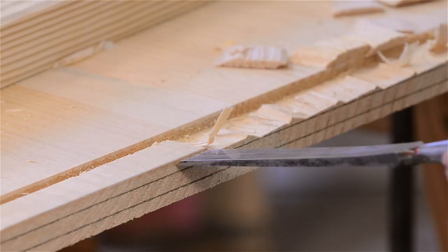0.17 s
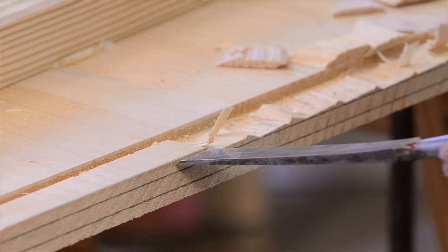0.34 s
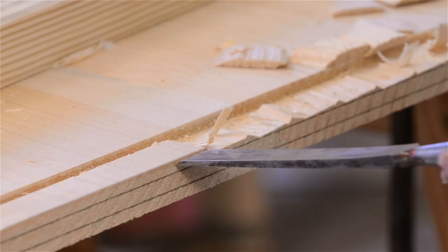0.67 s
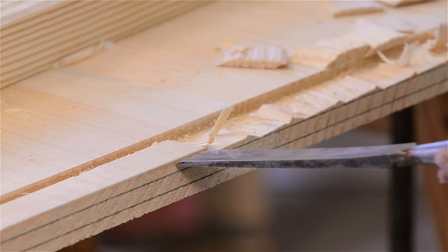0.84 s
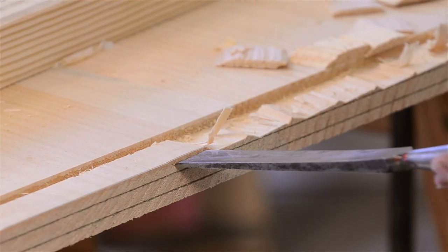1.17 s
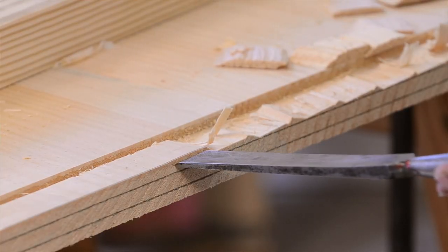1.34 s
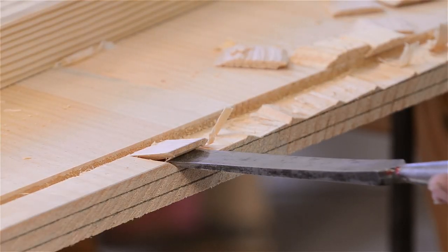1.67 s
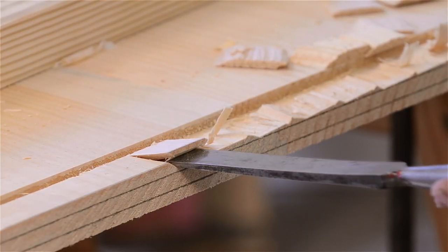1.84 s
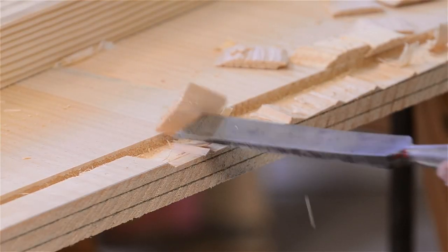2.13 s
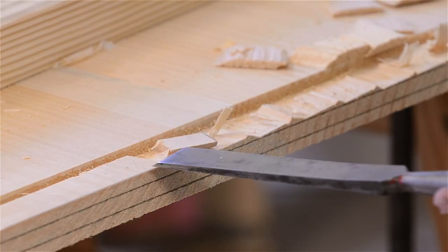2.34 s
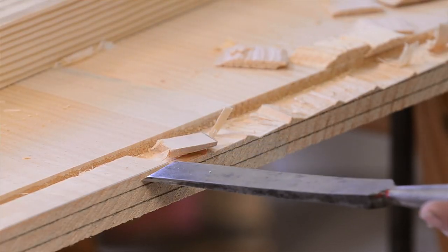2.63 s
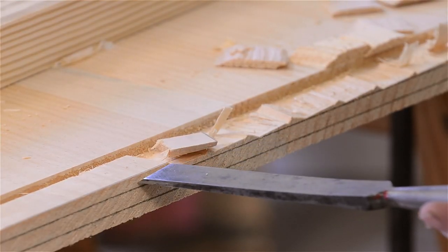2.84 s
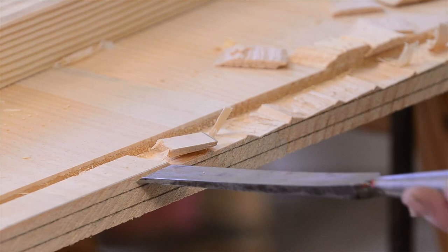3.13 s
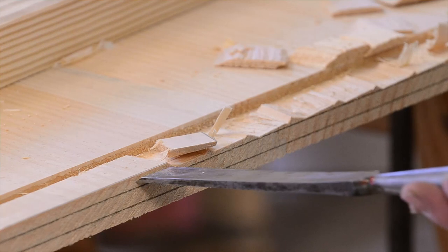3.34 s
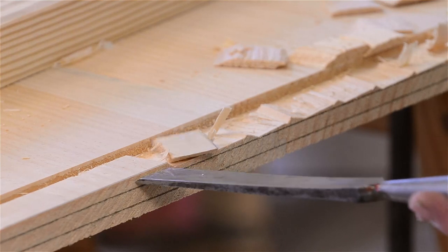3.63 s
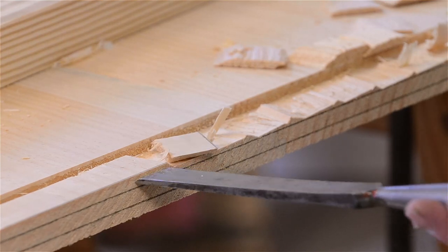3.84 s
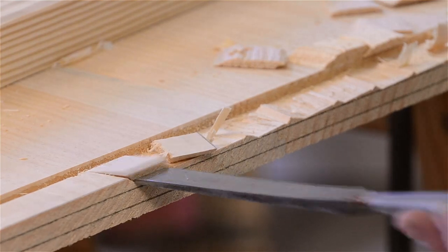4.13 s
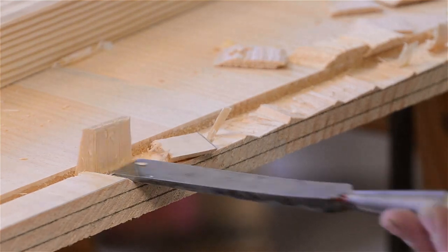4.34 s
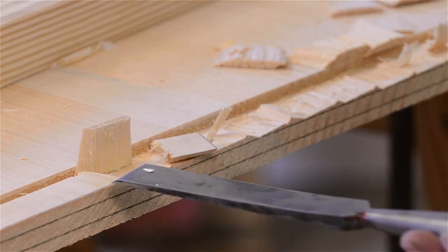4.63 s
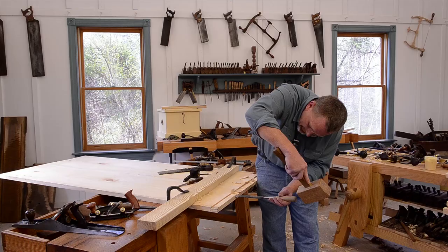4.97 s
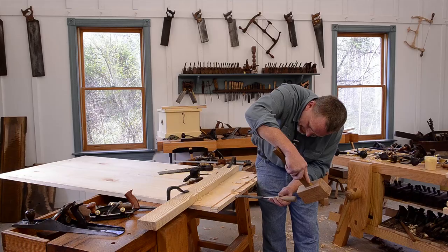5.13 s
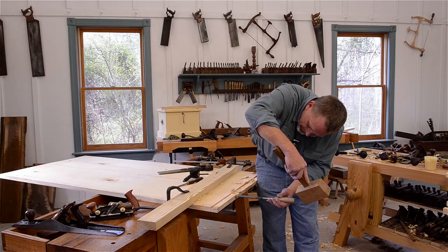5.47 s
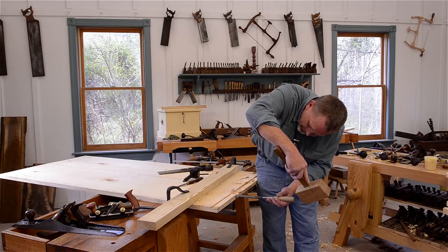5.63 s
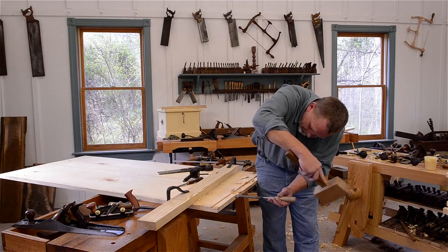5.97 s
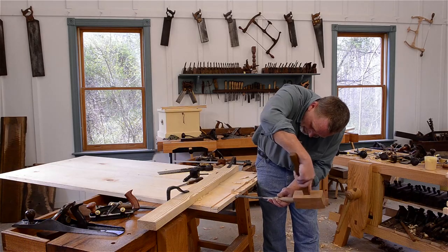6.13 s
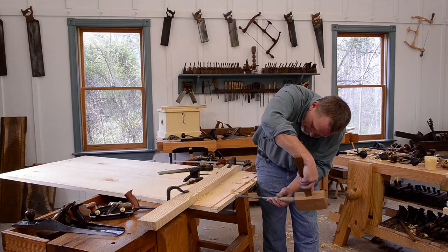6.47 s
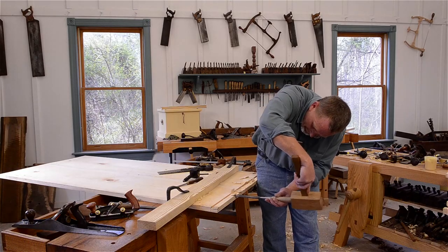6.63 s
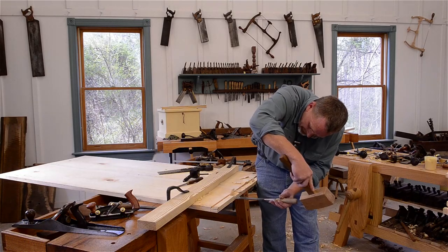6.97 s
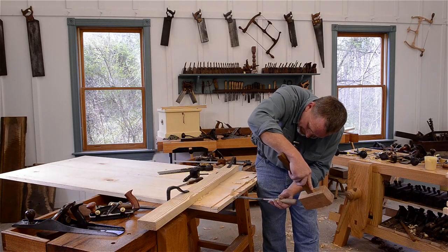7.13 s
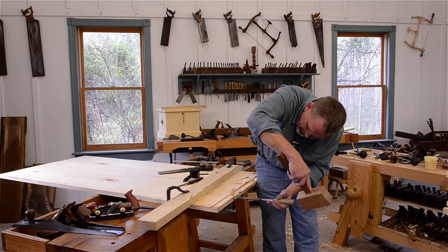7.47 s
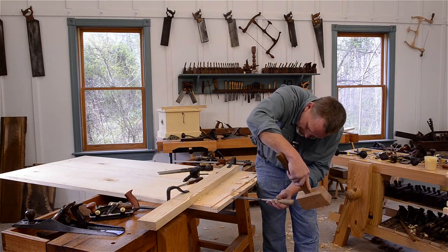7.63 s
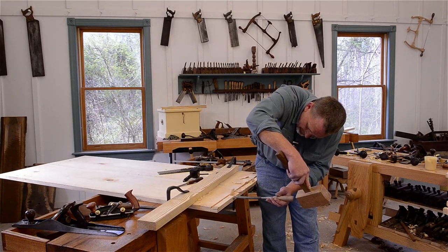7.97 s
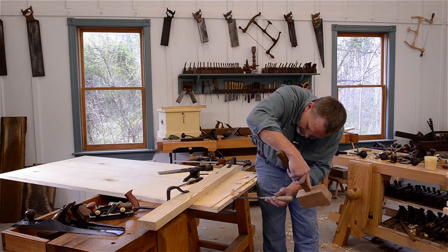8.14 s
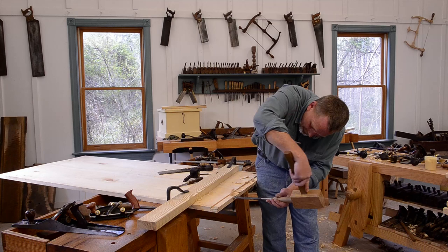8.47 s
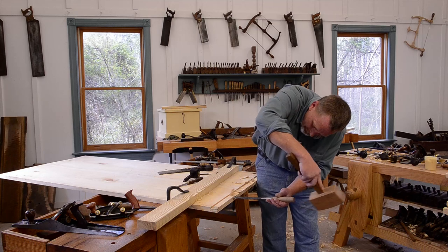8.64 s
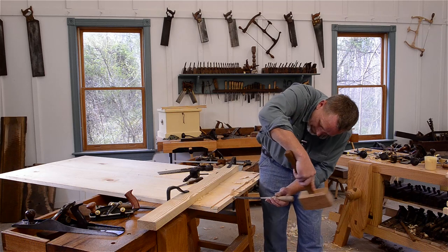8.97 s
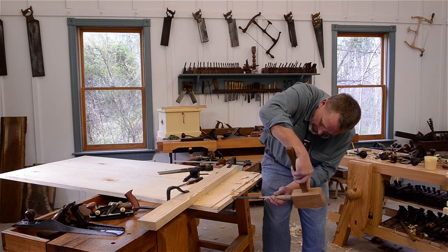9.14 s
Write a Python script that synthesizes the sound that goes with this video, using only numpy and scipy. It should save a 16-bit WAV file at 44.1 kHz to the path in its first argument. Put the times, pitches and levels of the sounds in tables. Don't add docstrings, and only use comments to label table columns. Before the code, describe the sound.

A small, live wooden workshop, heard close in stereo, with faint lamp hum, soft hiss and low rumble. Low air buffets, mostly on the right, flutter in the first half second. A mallet strikes a chisel at 0.4, 0.7, 1.0, 1.2, 1.4, 1.7 and 1.9 seconds: hollow thud and knock, hard clack, brief steely ring, the blow near 1.0 especially full. The softer last one bursts into bright snaps and tearing as the chip lifts, with more air flutter until 2.3; tiny chip taps follow at 2.5 and 2.6. Echo dies over about a second. Three blows at 3.6, 3.9 and 4.2 tear fibres, trailing fine ticks to 4.7. A faint bump comes near 4.9. Blows at 6.1, 6.4 and 6.6 end in sharp splinter pings. After near quiet, blows fall at 8.4, 8.8 and 9.0, the middle one loudest and slightly overloaded, with a rebound and dry rasp ending over the echo.

```python
import sys
import numpy as np
from scipy import signal
from scipy.fft import rfft, irfft, next_fast_len
from scipy.io import wavfile
from scipy.ndimage import uniform_filter1d, map_coordinates

SR = 44100
rng = np.random.default_rng(int(sys.argv[2]) if len(sys.argv) > 2 else 0)


def waveform_to_disk(signal):
    frames = np.transpose(np.atleast_2d(signal))
    scaled = np.clip(frames, -1, 1) * 32767
    samples = np.round(scaled).astype(np.int16)
    wavfile.write(sys.argv[1], SR, samples)


def amplitude_ratio(level_db):
    exponent = np.asarray(level_db, float) / 20
    return 10 ** exponent


N = 410130

# start in seconds, then levels in dB of the bench thud, board knock,
# mallet clack and edge crack.
BLOWS = [(0.4003, -6.5, -7, -13.5, -27.5), (0.732, -5, -2, -13, -27.5), (0.97, 0, 1, -11.5, -24.5),
         (1.199, -3.5, -4.5, -9.5, -21), (1.431, -5.5, -0.5, -7.5, -11), (1.662, -5.5, -14.5, -8, -21.5),
         (1.8855, -16, -12.5, -21, -29), (3.63, -6.5, -3.5, -12, -24), (3.918, -3, 0, -12, -16.5),
         (4.173, -16.5, -8, -12, -26.5), (6.128, -4, -1, -3.5, -18), (6.409, -12.5, 0.5, -10, -13.5),
         (6.637, -15, -14.5, -17, -22), (8.428, -9.5, -13.5, -17, -38.5), (8.771, -5, 9.5, -2, -13.5),
         (9.034, -21, 5.5, -10.5, -26.5)]
# start in seconds, then levels in dB
KNOCKS = [
    (0.009, -41.5, -55.5, -46, -72),
    (1.894, -8.5, -4, -38.5, -34),
    (2.463, -21.5, -36, -55, -67.5),
    (2.648, -23, -36, -49.5, -63),
    (4.941, -34, -53, -50, -72),
    (6.652, -28.5, -16.5, -32, -40),
    (7.552, -43.5, -81, -83.5, -81),
    (9.039, -2.5, -21.5, -8.5, -26),
]
BOARD_REST_HZ = 340


def at_hz(points, hz):
    points = np.array(points)
    return np.interp(np.log(np.maximum(hz, 1)), np.log(points[:, 0]), points[:, 1])


def rms_one(x):
    return x / np.sqrt(np.mean(x ** 2) + 1e-20)


def coloured(x, points):
    size = x.shape[-1]
    hz = np.arange(size // 2 + 1) * SR / size
    return irfft(rfft(x) * amplitude_ratio(at_hz(points, hz)), size)


def drift(rate_hz):
    steps = rng.standard_normal(int(N / SR * 40) + 3)
    return np.interp(np.arange(N) / SR * rate_hz, np.arange(len(steps)), steps)


def add(out, s, sound):
    i = round(s * SR)
    out[i:i + len(sound)] += sound[:N - i]


def bump(hz, centre_hz, db, width=.07):
    return db * np.exp(-.5 * (np.log(np.maximum(hz, 1) / centre_hz) / width) ** 2)


def two_bumps(hz, row):
    return bump(hz, *row[:2], width=0.093) + bump(hz, *row[2:4], width=0.078)


def pulse(level_db):
    cepstrum = irfft(np.log(amplitude_ratio(level_db)))
    cepstrum[1:len(level_db) - 1] *= 2
    cepstrum[len(level_db):] = 0
    return irfft(np.exp(rfft(cepstrum)))


def run_of(s):
    run_starts_s = [3.5, 6, 8.3]
    return np.searchsorted(run_starts_s, s)


def lamp_hum():
    # pitch in Hz, level in dB.
    tones = [(118.4, -71), (242.2, -76), (360.7, -72.5), (479.1, -77), (602.9, -88), (839.8, -85),
             (1319, -92.5), (1561, -89.5), (1680, -89), (1922, -90.5)]
    t, hum = np.arange(N) / SR, np.zeros(N)
    for k, (hz, db) in enumerate(tones):
        hum += np.sqrt(2) * amplitude_ratio(db) * np.sin(2 * np.pi * hz * t + k * k)
    return hum


def hiss():
    # pitch in Hz, level in dB per Hz.
    shop_colour = [(59, -40.5), (100, -0.5), (310, -7.5), (359, -1), (405, -10.5), (477, -4.5), (537, -10),
                   (1590, -18.5), (2600, -23.5), (3500, -36), (4550, -56.5), (7700, -120)]
    # time in seconds, level in dB.
    shop_level = [(0, -58.5), (.35, -53), (2.4, -54), (3, -60), (3.5, -69.5), (4.8, -60), (5.3, -61),
                  (5.7, -70.5), (6.05, -59.5), (7.3, -62.5), (7.8, -74), (8.3, -63.5), (9.3, -62)]
    # pitch in Hz, level in dB per Hz.
    mic_colour = [(1500, -11), (3500, 3.5), (9000, 0.5), (12000, -4), (15700, -9)]
    white = rng.standard_normal((3, N))
    level_db = np.interp(np.arange(N) / SR, *np.transpose(shop_level)) + .8 * drift(2.5)
    shop = rms_one(coloured(white[0] + 0.22 * white[1:], shop_colour))
    return amplitude_ratio(level_db) * shop + amplitude_ratio(-76.0) * rms_one(coloured(white[1:], mic_colour))


def air():
    # start in seconds, length in seconds, level in dB, left minus right in dB.
    gust_rows = [(-0.07, 0.115, -38, -29.5), (.1, .04, -49, -13), (.19, .03, -52, -12),
                 (0.275, 0.1, -39, -24.5), (0.46, 0.03, -34, -3), (1.985, 0.025, -36, -10),
                 (2.065, .035, -30, -16), (2.12, .07, -36, -8), (2.2, .065, -31.5, -11),
                 (2.33, .03, -44, -18), (3.47, .06, -58, 0.5), (6.06, .06, -54, 2.5)]
    # pitch in Hz, level in dB per Hz.
    gust_colour = [(10, -23.5), (25, -4.5), (45, -0.5), (100, -9), (180, -21), (400, -60), (1000, -130)]
    # pitch in Hz, level in dB per Hz.
    rumble_colour = [(8, -9.5), (22, 1.5), (45, -5.5), (90, -16.5), (200, -48)]
    # pitch in Hz, level in dB.
    jolt_colour = [(25, -6), (60, 0.05), (130, 4.5)]
    jolt_run_db = [-3.5, 2, 4, -2]
    gust_rise_s, gust_fall_db_per_s, gust_even_s, still_air_db = 0.02, 320, .045, -72
    jolt_db, jolt_rise_s, jolt_t60_s = -27.5, .012, 0.27
    t = np.arange(SR) / SR
    winds = rms_one(coloured(rng.standard_normal((3, N)), gust_colour))
    both = winds[2]
    left, right = (v / np.sqrt(uniform_filter1d(v ** 2, size=round(gust_even_s * SR)) + 1e-3) for v in winds[:2])
    rumble = amplitude_ratio(-59.5 + 2.6 * drift(5.3)) * rms_one(coloured(rng.standard_normal(N), rumble_colour))
    gusts, jolts = np.full((2, N), amplitude_ratio(still_air_db)), np.zeros(N)
    for s, length, db, lean_db in gust_rows:
        age = t - min(s, 0)
        fall_db = gust_fall_db_per_s * np.maximum(age - length, 0)
        shape = np.minimum(age / gust_rise_s, 1) * amplitude_ratio(db - fall_db)
        add(gusts[0], max(s, 0), shape * amplitude_ratio(lean_db / 2))
        add(gusts[1], max(s, 0), shape * amplitude_ratio(-lean_db / 2))
    for s, thud_db, *_ in BLOWS + KNOCKS:
        level_db = jolt_db + jolt_run_db[run_of(s)] + thud_db - 60 * t / jolt_t60_s
        add(jolts, s, amplitude_ratio(level_db) * (1 - np.exp(-(t / jolt_rise_s) ** 2)))
    return gusts * [left, right] + rumble + jolts * rms_one(coloured(both, jolt_colour))


def workshop(x, wet_db, onset_s):
    # pitch in Hz, seconds to fade by 60 dB.
    room_t60 = [(60, 0.8), (160, 0.97), (420, 1.05), (1100, 0.96), (1700, 1), (2250, 1.05), (3000, .9),
                (5000, 0.82), (11000, 0.62), (15000, 0.5)]
    # pitch in Hz, level in dB.
    room_colour = [(60, -18.5), (130, -9.5), (200, 1.5), (250, 6.5), (340, 3), (450, 0.5), (700, -2.5),
                   (1000, -0.5), (1600, -4.5), (2300, -2.5), (3500, -7.5), (6000, -11), (11000, -18.5),
                   (11800, -25), (13000, -29), (15500, -32)]
    # pitch in Hz, likeness of left and right from 0 to 1.
    likeness = [(60, 0.8), (300, .99), (600, .9), (1200, .9), (2400, .62), (4800, .1), (12000, 0.1)]
    bands_hz = 40 * 2 ** np.arange(0, 8.8, 1 / 3)
    t = np.arange(int(1.6 * SR)) / SR
    white, answer = rng.standard_normal((2, 2, len(t))), 0
    for k, (low, high) in enumerate(zip(bands_hz, bands_hz[1:])):
        band = signal.butter(2, [low, high], "band", fs=SR, output="sos")
        mid, side = signal.sosfilt(band, white[k % 2])
        hz = np.sqrt(low * high)
        alike = np.clip(at_hz(likeness, hz), 0, 1)
        fall_db = -60 * t / at_hz(room_t60, hz)
        fall = amplitude_ratio(fall_db) + amplitude_ratio(-30 + 0.45 * fall_db)
        stereo = np.sqrt(1 + alike) * mid + np.sqrt(1 - alike) * side * [[1], [-1]]
        answer = answer + amplitude_ratio(wet_db + at_hz(room_colour, hz)) * fall * stereo
    answer = answer * (1 - np.exp(-(t / onset_s) ** 2))
    return signal.fftconvolve(x[None], answer)[:, :N]


def tearing():
    # start in seconds, length in seconds, level at start in dB, level at end in dB, favoured pitch in Hz.
    stretches = [(1.901, 0.067, -54, -50, 9010), (1.975, .32, -62.5, -78, 5500),
                 (3.122, .12, -77.5, -81, 6520), (5.36, .2, -84, -75, 8000), (8.03, .1, -74, -77.5, 8000),
                 (3.718, .2, -71.5, -57, 11000), (3.935, .25, -47, -57, 8100),
                 (4.192, .21, -55.5, -58.5, 11000), (4.397, .15, -61, -83.5, 11000),
                 (5.797, .33, -80.5, -69.5, 10030), (6.686, 0.17, -58, -77, 10050),
                 (8.58, .195, -75.5, -66.5, 10480), (9.041, .14, -58, -74, 12500),
                 (9.2, .12, -61.5, -56.5, 9500), (5.27, .05, -80, -80, 7980),
                 (8.435, .16, -66.5, -76.5, 12530)]
    # pitch in Hz, level in dB per Hz.
    tear_colour = [(1500, -34.5), (3000, 3.5), (5000, 1.5), (7000, -4), (10000, -0.5), (13000, -3),
                   (15700, -2)]
    edge_s = 0.013
    out = np.zeros((2, N))
    snaps = rng.standard_normal((2, N)) * amplitude_ratio(1.5 * rng.exponential(1, N))
    snaps = rms_one(coloured(snaps[0] + .5 * snaps, tear_colour))
    for s, length, start_db, end_db, favoured_hz in stretches:
        piece = snaps[:, round(s * SR):][:, :round(length * SR)]
        t = np.arange(piece.shape[1]) / SR
        hz = np.arange(len(t) // 2 + 1) * SR / len(t)
        grains = irfft(rfft(piece) * amplitude_ratio(bump(hz, favoured_hz, 5.5, width=.25)), len(t))
        edges = np.clip(np.minimum(t, length - t) / edge_s, 0, 1)
        level = amplitude_ratio(start_db + (end_db - start_db) * t / length)
        for port, sound in zip(out, grains):
            add(port, s, sound * edges * level)
    return amplitude_ratio(3.0) * out


def ticks():
    # start in seconds, peak in dB, pitch in Hz.
    tick_rows = [(0.4579, -6.5, 2120), (2.1795, -48.5, 2780), (2.2236, -38, 2600), (2.2233, -47.5, 6000),
                 (2.4633, -58, 2850), (2.5447, -53.5, 3700), (2.6138, -59, 2840), (2.6484, -57, 2720),
                 (3.8097, -35.5, 2825), (5.0194, -64, 8000), (8.5099, -49, 3140),
                 (1.9657, -22.5, 12050), (2.2787, -49.5, 8840), (2.7487, -55.5, 9040),
                      (4.2969, -34.5, 8990), (4.5996, -59, 8000), (4.6264, -55.5, 8000),
                      (4.6435, -51, 10040), (4.679, -65.5, 8530), (4.7145, -60, 11470), (6.656, -28, 9930),
                      (6.922, -49, 12000), (0.458, -32.5, 6960), (6.9605, -42, 7080),
                      (6.9876, -45.5, 10320),
                 (2.546, -57.5, 10500),
        (2.648, -62, 9300),
        (2.7089, -64, 13100),
        (2.8, -63, 11000),
        (4.298, -41, 5570),
        (9.21, -53.5, 13000),
        (9.236, -50.5, 8000),
    ]
    out, t = np.zeros(N), np.arange(SR // 50) / SR
    for s, peak_db, hz in tick_rows:
        skirts = [(hz / 2.2, -24), (hz / 1.2, -2), (hz * 1.2, -2), (hz * 1.8, -15), (hz * 4, -32)]
        grit = rms_one(coloured(rng.standard_normal(len(t)), skirts))
        add(out, s, amplitude_ratio(peak_db - 4.0 - 60 * t / 0.009) * grit)
    return out


def pings():
    # start in seconds, peak in dB, pitch in Hz, seconds to fade by 60 dB.
    ping_rows = [(1.8885, -22, 12070, 0.011), (1.892, -18, 11480, 0.0067), (1.903, -35.5, 8800, .008),
                 (1.91, -34, 9920, .008), (1.92, -38, 11480, 0.032), (1.922, -33, 5990, 0.016),
                 (1.94, -34, 9000, .01), (1.9445, -32, 9030, 0.017), (1.947, -37, 11790, .03),
                 (1.962, -40, 12000, .01), (4.187, -30, 9010, 0.0074), (4.1955, -29, 9750, .006),
                 (4.199, -36, 10750, 0.0092), (4.203, -33, 11000, .012), (4.211, -35.5, 11000, 0.013),
                 (6.648, -33.5, 10500, 0.0082), (6.656, -19, 12300, 0.011), (6.6595, -29, 12000, .012),
                 (6.66, -31, 10020, 0.0088), (6.663, -33, 6200, .008), (6.6675, -27.5, 10500, .008),
                 (6.6715, -25, 11900, 0.02), (6.682, -30, 11480, .006), (2.464, -62.5, 5740, 0.026),
                 (2.648, -60.5, 5700, 0.027), (5.015, -62, 4203, 0.039), (6.9015, -51.5, 14500, 0.0063),
                 (6.951, -55, 11000, 0.0054), (6.979, -54, 9470, 0.0049), (9.088, -48, 13500, 0.0061),
                 (2.755, -66, 10130, .15), (.74, -52, 11150, .5), (.98, -46, 11200, .5),
                 (.98, -43, 6970, .6), (.98, -44, 8450, .6)]
    out, t = np.zeros(N), np.arange(SR // 4) / SR
    for s, peak_db, hz, t60 in ping_rows:
        rough = 1 + 1.8 * uniform_filter1d(rng.standard_normal(len(t)), size=12)
        rise = np.minimum(t / .0006, 1)
        add(out, s, amplitude_ratio(peak_db - 60 * t / t60) * rise * rough * np.sin(2 * np.pi * hz * t))
    return out


def strike(hit, contact, shade, snap, note_hz, ring_db, crack_db, push_db, spread_db):
    # pitch in Hz, seconds to fade
    # by 60 dB, then level in dB in run 1, 2, 3, 4.
    resonances = [(103, 0.23, -19.5, -16, -15, -13), (1805, 0.8, -27.5, -31, -29.5, -29),
                  (2340, 0.2, -33, -35.5, -28, -28), (172, 0.1, -7.5, -11.5, -5.5, -11),
                  (244.7, 0.12, -1.5, -6.5, 0, -4.5), (309, 0.074, -4, -4, -5.5, -4.5),
                  (343, 0.11, -0.5, -4, -3.5, -5.5), (423.6, 0.13, -4.5, -6.5, -5, -3),
                  (494, 0.034, -8, 1.5, -4, 1.5), (587, 0.065, -7, -2, 5.5, -4),
                  (706, 0.039, 3.5, -13, -8, -10.5), (780.7, 0.035, -1.5, -8, 1.5, -5),
                  (970, 0.0083, -6.5, -16, -11, -8.5), (1163, 0.029, -12.5, -9, -15.5, -2),
             (1230, 0.052, -6.5, -6.5, -10, -7), (1400, 0.047, -5, -6.5, 0, -7.5),
             (1600, 0.019, -14, -19, -14, 9), (2070, 0.023, -7.5, -6.5, 5.5, -13),
             (2244, 0.053, -6, -1.5, -3, -8.5), (2705, 0.029, 1.5, -4.5, 1.5, -5.5),
             (2923, 0.076, -14, -7, -13.5, -7), (3580, 0.058, -14, -8.5, -14.5, -12),
             (4170, 0.049, -17.5, -16, -7, -9)]
    # pitch in Hz, level in dB.
    crack_colour = [(60, -33), (200, -2), (700, 1), (2000, 3.5), (4000, 0.5), (8000, 5.5), (11000, -1),
                    (13500, -4), (15500, -13), (18000, -28.5)]
    # pitch in Hz, then level in dB in run 1, 2, 3, 4.
    bench_colour = [(200, -3, -1.1, 2, -0.1), (326, -6.5, 0.24, 3.5, -1.5), (560.4, -2, -2, 8.5, 3.5),
                    (765, 0.5, 0.53, 2, -0.4), (1300, 3, 0.088, 2, 1.2), (1810, -0.5, -0.2, 3.5, -0.5),
                    (2223, -3, 2.2, -6, 2), (3000, -1, 0.26, 1.5, 3.5), (3380, 1, 2, 0, 1.5),
                    (4100, -1, -2, -2, -0.9), (5287, -2.5, -0.81, 1, -1), (6200, 2.5, 0.5, 4, 3),
                    (7183, -0.5, -0.5, 3, 0.5), (8600, 4, -0.5, 5, 2), (9900, -0.5, -0.5, 4.5, 0.5),
                    (11000, 4, -0.5, 5, -0.5), (12000, -1.5, -0.5, 5, 1.5)]
    ring_share = .24
    s, thud, knock, clack, crack = hit
    edge_hz, wet_db, *cut = contact
    run = run_of(s)
    t = np.arange(16384) / SR
    axis_hz = np.arange(len(t) // 2 + 1) * SR / len(t)
    parts = [(250, thud), (750, knock), (1600, clack + 2.2), (edge_hz, clack - 2.5),
             (edge_hz * 1.12, crack + 5), (9000, crack)]
    parts_db = at_hz(parts, axis_hz)

    hz, t60, *runs_db = np.transpose(resonances)
    swell = 1 - np.exp(-(np.outer(hz, t) / .9) ** 2)
    rings = np.sin(2 * np.pi * np.outer(hz, t)) * amplitude_ratio(-60 * t / t60[:, None]) * swell
    chance = rng.standard_normal((2, len(hz)))
    level_db = runs_db[run] + at_hz(parts, hz) + ring_db + spread_db * chance[0]
    level_db += 0.35 * (bump(hz, *cut[:2]) + bump(hz, *cut[2:]))
    ring = amplitude_ratio(level_db + two_bumps(hz, shade)) * np.sign(chance[1]) @ rings
    close = amplitude_ratio(level_db + two_bumps(hz, snap)) * np.sign(chance[1]) @ rings
    ring, close = (np.interp(t * note_hz / BOARD_REST_HZ, t, v, right=0) for v in (ring, close))

    grit_db = at_hz(crack_colour, axis_hz) + parts_db + two_bumps(axis_hz, snap)
    grit = irfft(rfft(rng.standard_normal(len(t))) * amplitude_ratio(grit_db))
    dull = signal.sosfilt(signal.butter(2, 6000, fs=SR, output="sos"), grit)
    burst = grit * amplitude_ratio(-60 * t / snap[4]) + dull * amplitude_ratio(-17.0 - 60 * t / 0.044)
    near = close + amplitude_ratio(crack_db) * burst * np.minimum(t / 0.00019, 1)

    radiated_db = at_hz([(row[0], row[1 + run]) for row in bench_colour], axis_hz) + parts_db
    radiated_db += bump(axis_hz, *cut[:2]) + bump(axis_hz, *cut[2:]) + two_bumps(axis_hz, shade)
    radiated_db += at_hz([(7000, 0), (9500, shade[4])], axis_hz)
    push = amplitude_ratio(wet_db) * (amplitude_ratio(push_db) * pulse(radiated_db) + ring_share * ring)
    return near, push


def soft_knocks():
    contact = (1900, -4, 250, 0, 250, 0)
    plain, snap = (250, 0, 250, 0, 0), (330, -5, 250, 1.75, .013)
    near, push = np.zeros(N), np.zeros(N)
    for hit in KNOCKS:
        close, pushed = strike(hit, contact, plain, snap, BOARD_REST_HZ,
                               ring_db=-8.0, crack_db=-8.5, push_db=29.5, spread_db=3.5)
        add(near, hit[0], close)
        add(push, hit[0], pushed)
    return near, push


def mallet_blows():
    # pitch in Hz above which the wood is driven less, share sent to the room in
    # dB, favoured pitch in Hz, its boost in dB, pitch in Hz that sounds weaker.
    contacts = [(3004, -0.5, 1900, -0.5, 470), (3530, 1.5, 2200, 2, 180), (3700, 4, 4700, 3.5, 270),
                (3694, 2.5, 720, 0.5, 230), (3700, 0.5, 330, 6.5, 300), (3307, -1.5, 1100, 12.5, 1100),
                (2910, 0.5, 580, -6.5, 4100), (2930, 2.5, 320, 7, 590), (2960, 1.5, 1550, 7, 220),
                (2820, 2.5, 1030, 3.5, 1520), (4600, 2, 2250, 6.5, 600), (3700, -0.5, 3640, 7.5, 570),
                (2230, -5.5, 1500, 8.5, 1700), (2148, 0, 3060, 5, 1640), (3700, 2, 510, 2, 830),
                (4130, -7.5, 1500, 3.5, 780)]
    # resonance in Hz, its level in dB, second resonance in Hz, its level in dB,
    # treble above 8 kHz in dB.
    shades = [(800, 4.5, 290, -7.5, -10), (530, -6, 1340, 5.5, 4.5), (600, -6, 190, -5.5, 4.5),
              (850, 5.5, 1200, 5.5, 3), (664, 5.5, 2130, 3.5, 2), (806, 15.5, 300, -12, -2),
              (250, -2, 710, -2.5, 2), (267, -3.5, 1300, 3.5, 0), (3400, -8, 950, -12, 2.5),
              (3920, 8, 2400, -1.5, 0), (1880, 4, 3800, 3, 2), (686, -8, 2700, 1, 0),
              (540, -2.5, 1700, -4, 1.5), (262, -5.5, 1380, -3.5, -4), (266, 3.5, 1200, 2.5, 2),
              (817, 11.5, 600, -5, 0.5)]
    # resonance in Hz, its level in dB, second resonance in Hz, its level in dB,
    # seconds for the snap to fade by 60 dB.
    snaps = [(4240, 7.5, 5500, 6.5, 0.015), (4800, -7, 280, 4, 0.026), (1050, 8.5, 4100, -5.5, 0.015),
             (1360, 6.5, 420, -5, 0.021), (249.9, -8, 9800, 6, 0.02), (213.4, -21.5, 670, 8.5, 0.018),
             (2119, -10, 3100, 6.5, 0.024), (270, 9, 550, 8, 0.02), (4240, -12, 1400, 4, 0.023),
             (266.2, 12, 3600, 11.5, .025), (1900, 5, 300, -6, 0.017), (1330, 7, 4100, -6, 0.024),
             (1650, 11, 310, 4.5, 0.019), (3850, 6, 2290, 4.5, 0.012), (211, -9.5, 350, 5.5, 0.018),
             (265, 14, 1500, -6, .02)]
    notes_hz = [338, 339.2, 337.4, 339.5, 341.7, 341, 332, 340.5, 337, 338.6, 341, 337, 338, 337.2, 342.9,
                338]
    damp_db = -14.5
    near, push = np.zeros(N), np.zeros(N)
    for hit, contact, shade, snap, note_hz in zip(BLOWS, contacts, shades, snaps, notes_hz):
        close, pushed = strike(hit, (*contact, damp_db), shade, snap, note_hz,
                               ring_db=-1.0, crack_db=10.5, push_db=26.5, spread_db=3.0)
        add(near, hit[0], close)
        add(push, hit[0], pushed)
    return near, push


def echoes(x, cut_hz):
    # delay in seconds, level in dB.
    reflections = [(.0045, -12), (.009, -4), (.014, -13.5), (.021, -16), (.028, -18)]
    dull, out = signal.sosfilt(signal.butter(2, cut_hz, fs=SR, output="sos"), x), x.copy()
    for k, (s, db) in enumerate(reflections):
        add(out, s, (-1) ** k * amplitude_ratio(db) * dull)
    return out


def ports(x, lag_s):
    # pitch in Hz, left minus right in dB.
    lean = [(200, .3), (1000, .5), (2000, 2), (4000, .5), (8000, 4.5), (12000, 3.5)]
    # pitch in Hz, phase shift between ports in radians.
    scatter = [(500, .2), (1200, .3), (2400, .4), (4800, 1.1), (9500, 1.1), (14000, 1.3)]
    scatter_step_hz = 900
    size = next_fast_len(N + 999)
    hz = np.arange(size // 2 + 1) * SR / size
    knots = rng.standard_normal(round(SR / 2 / scatter_step_hz) + 2)
    wobble = map_coordinates(knots, [hz / scatter_step_hz], order=3)
    phase = -np.pi * hz * lag_s + .5 * at_hz(scatter, hz) * wobble
    half = amplitude_ratio(at_hz(lean, np.maximum(hz, 200)) / 2) * np.exp(1j * phase)
    return irfft(rfft(x, size) * np.array([half, 1 / half]), size)[:, :N]


def scene():
    hard, hard_push = mallet_blows()
    soft, soft_push = soft_knocks()
    room = workshop(hard_push + soft_push, wet_db=-32.0, onset_s=0.01)
    room = room * amplitude_ratio([[0.5], [-0.5]])
    direct = ports(echoes(hard + soft, cut_hz=1100.0) + ticks() + pings(), lag_s=.000012)
    return direct + room + tearing() + hiss() + lamp_hum() + air()


def top_cut(x):
    return signal.sosfilt(signal.butter(12, 15850, fs=SR, output="sos"), x)


def record(dry):
    over_db = np.maximum(20 * np.log10(np.abs(dry).max(axis=0) + 1e-9) + 0.4, 0)
    recovery_db = 36.0 * np.arange(N) / SR
    held_db = np.maximum.accumulate(over_db + recovery_db) - recovery_db
    keep = np.exp(-1 / (0.015 * SR))
    ducked = dry * amplitude_ratio(-.6 * signal.lfilter([1 - keep], [1, -keep], held_db))
    low_pass = signal.butter(4, 16500, fs=SR, output="sos")
    return top_cut(signal.sosfilt(low_pass, np.clip(ducked, -.98, .98)))


dry = scene()
out = record(dry)
waveform_to_disk(out)
```